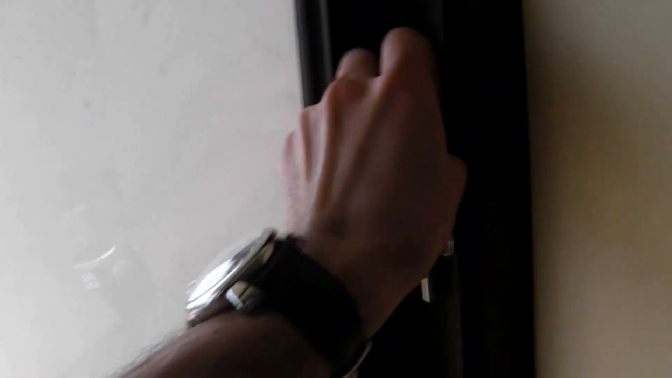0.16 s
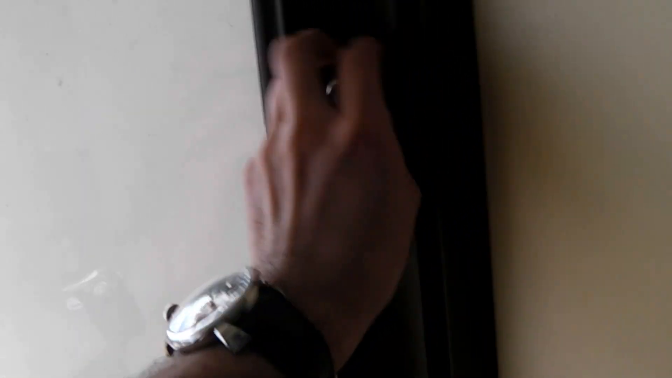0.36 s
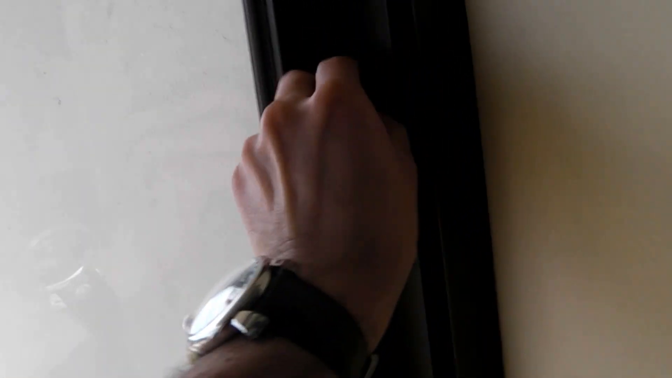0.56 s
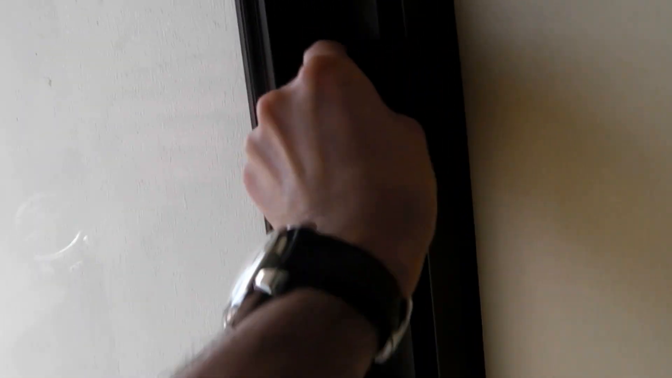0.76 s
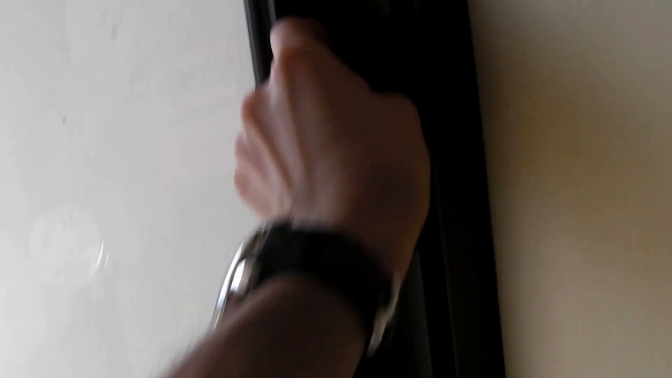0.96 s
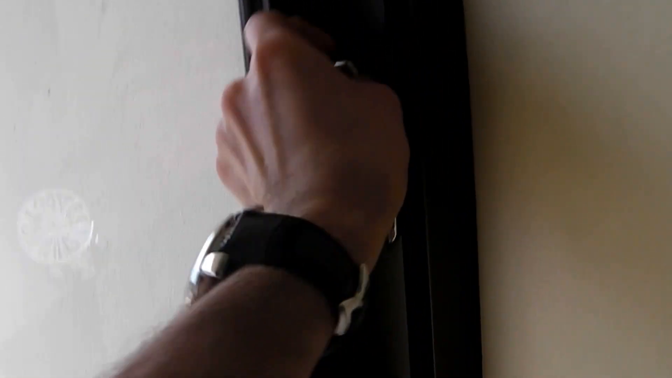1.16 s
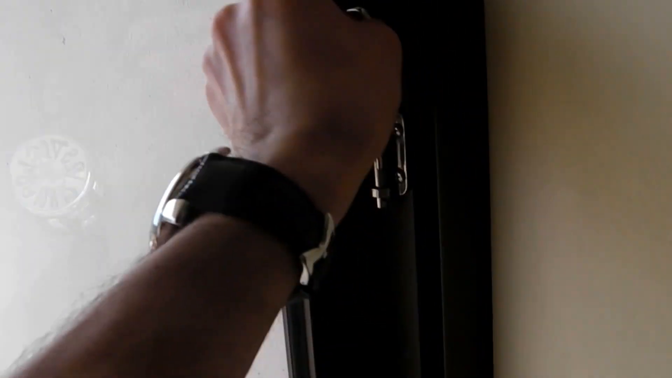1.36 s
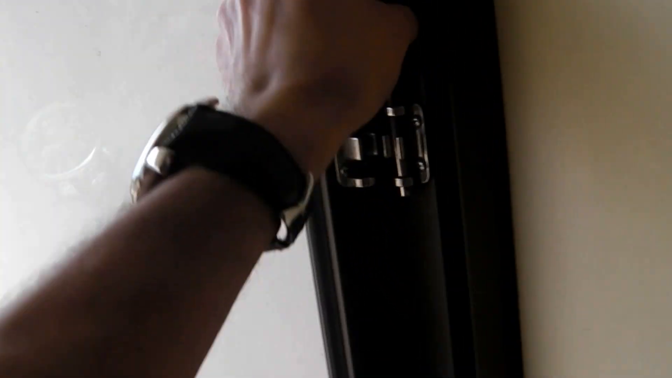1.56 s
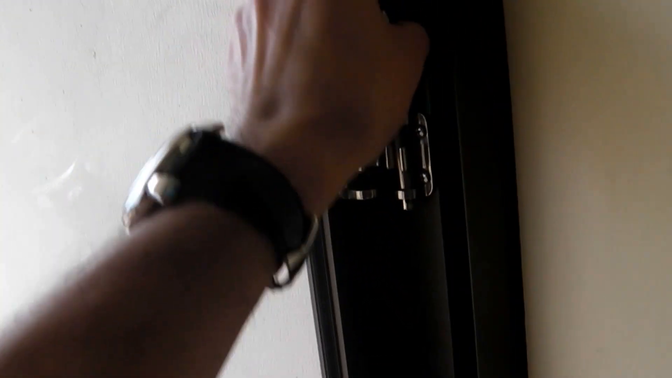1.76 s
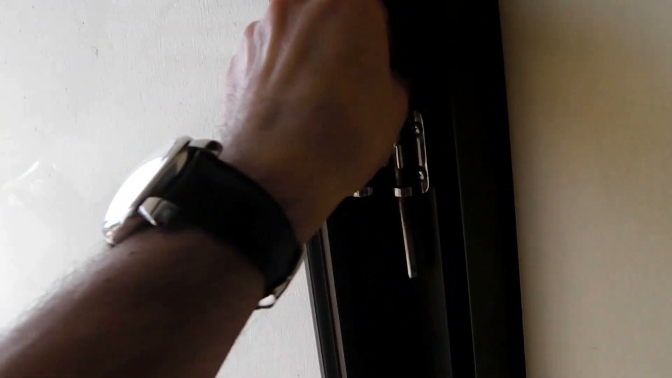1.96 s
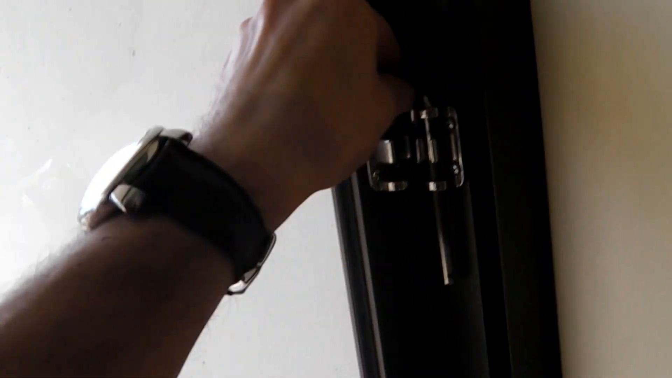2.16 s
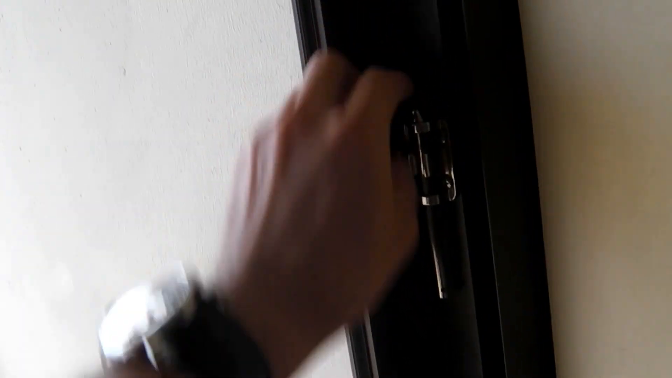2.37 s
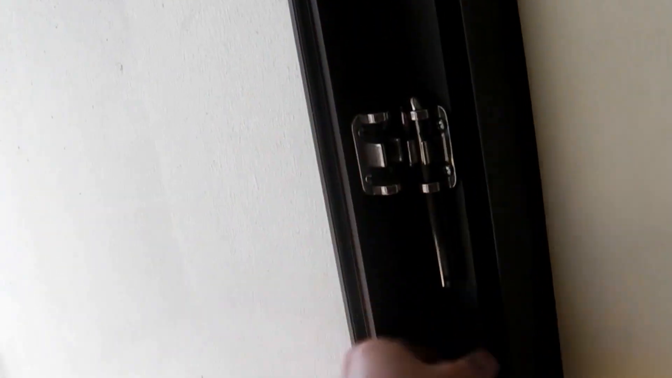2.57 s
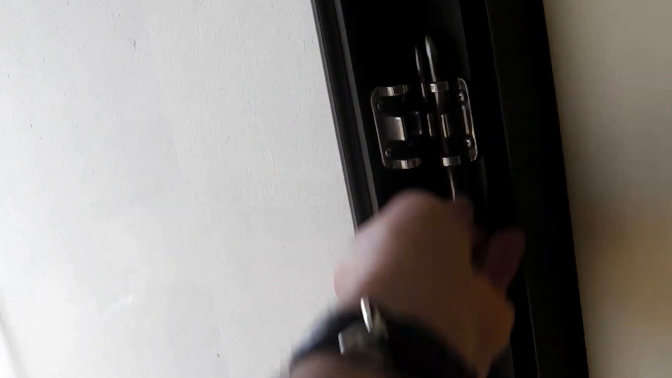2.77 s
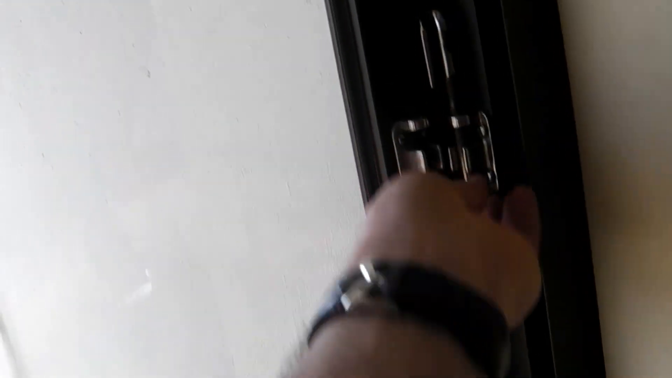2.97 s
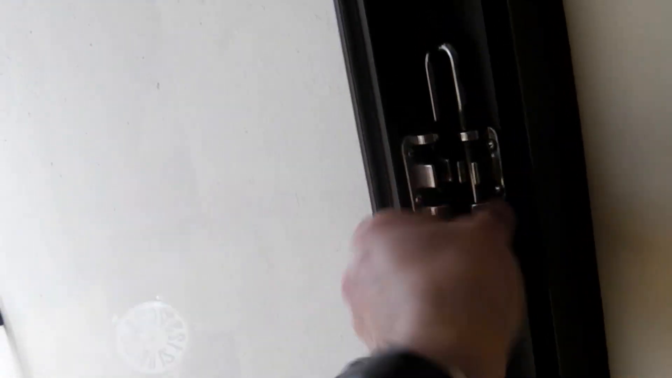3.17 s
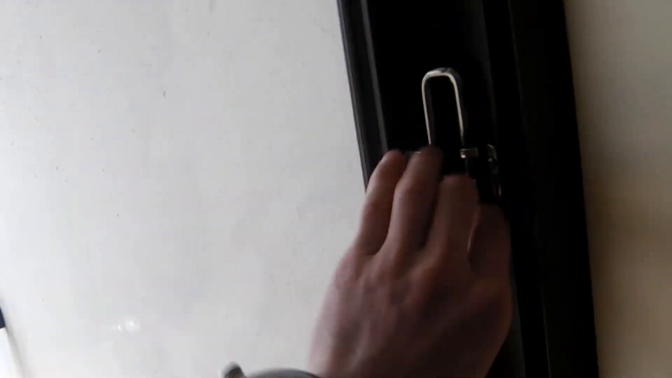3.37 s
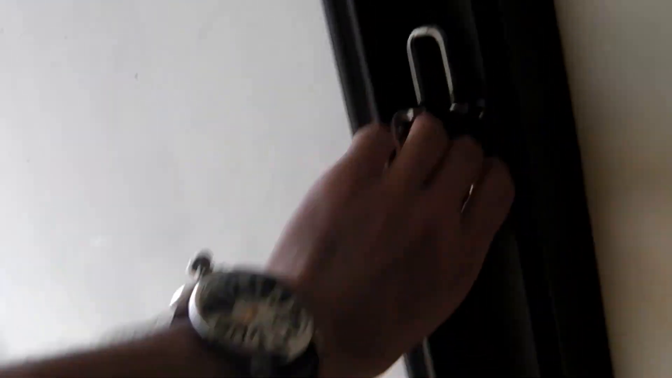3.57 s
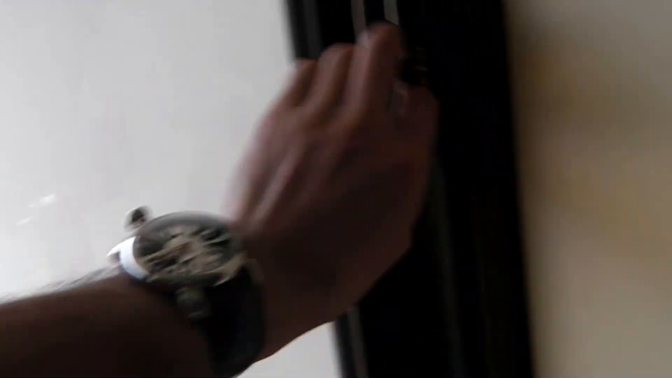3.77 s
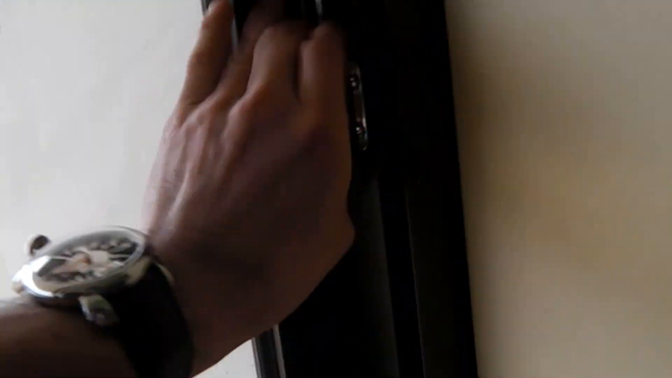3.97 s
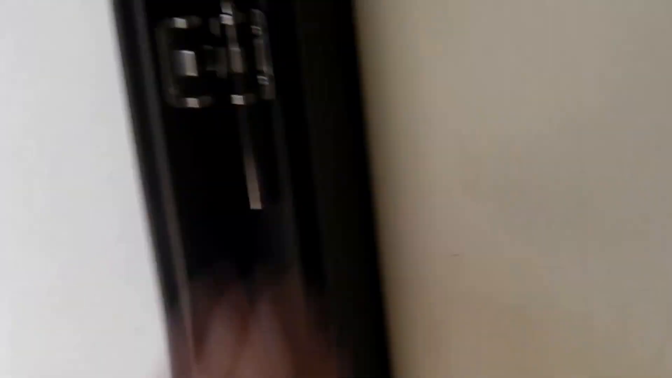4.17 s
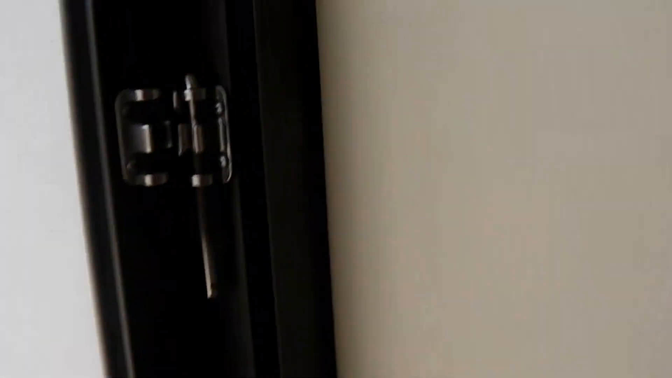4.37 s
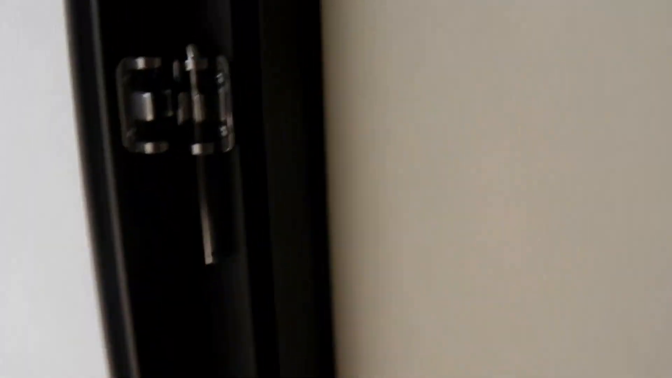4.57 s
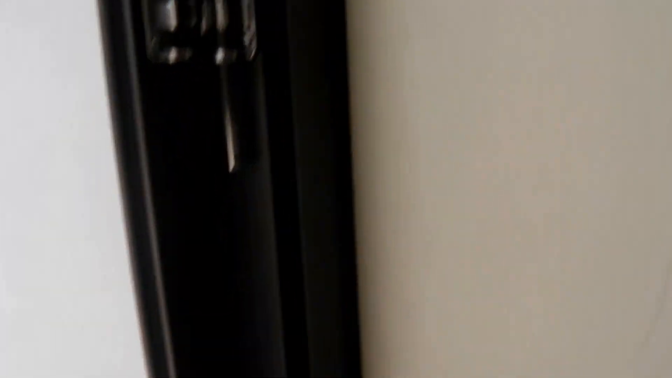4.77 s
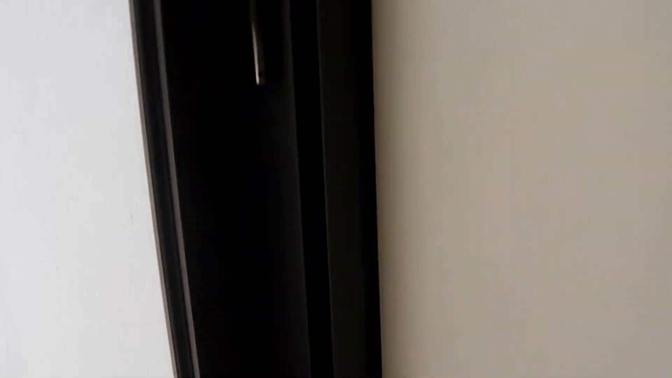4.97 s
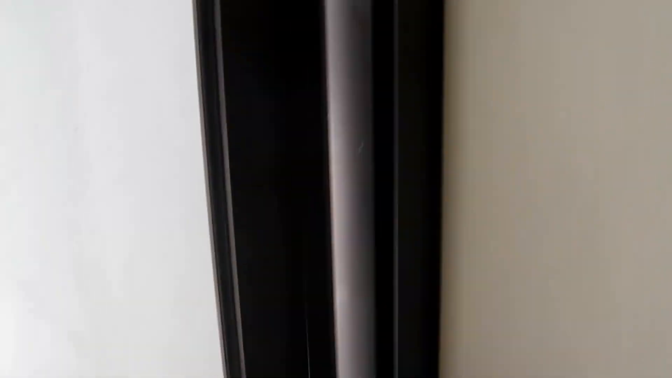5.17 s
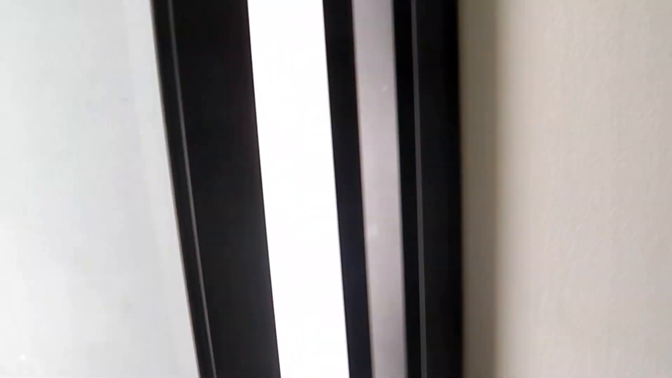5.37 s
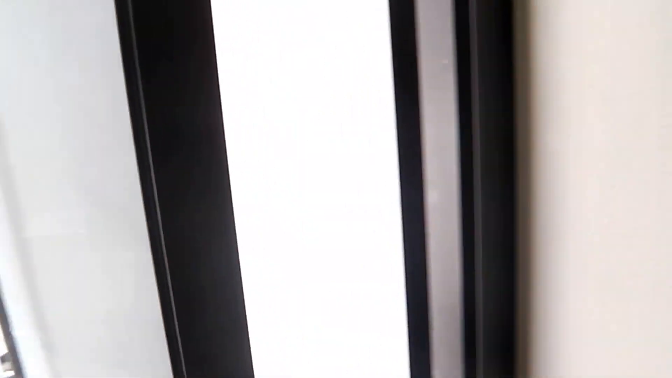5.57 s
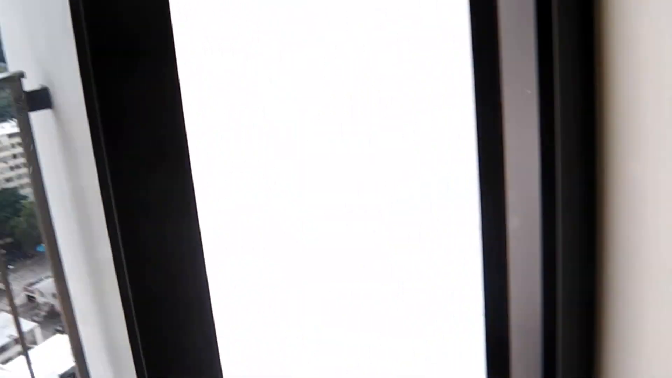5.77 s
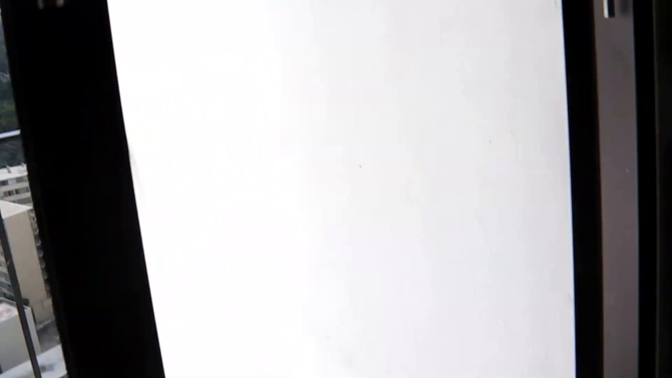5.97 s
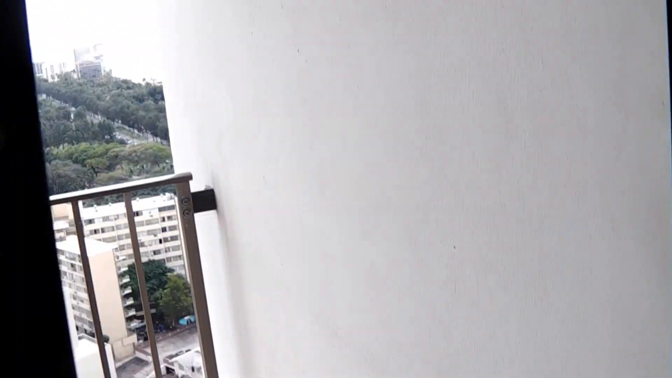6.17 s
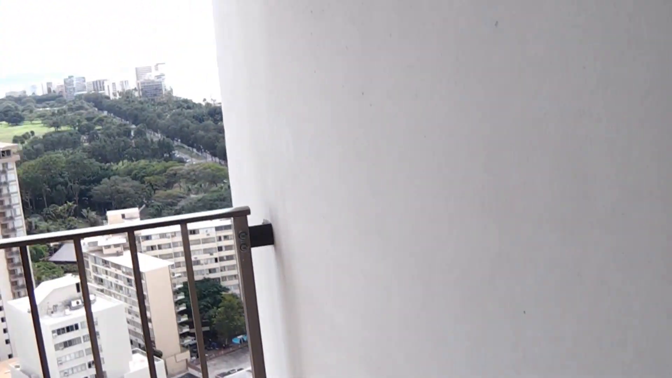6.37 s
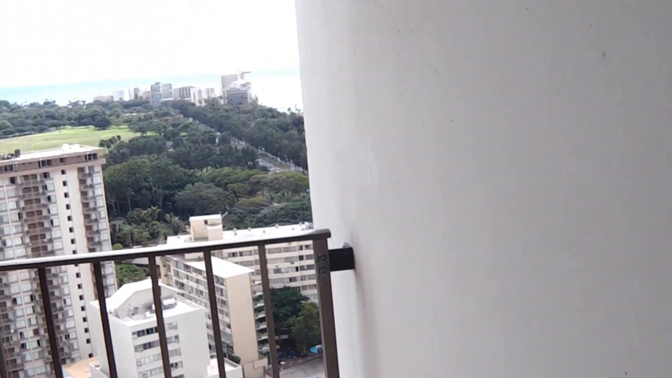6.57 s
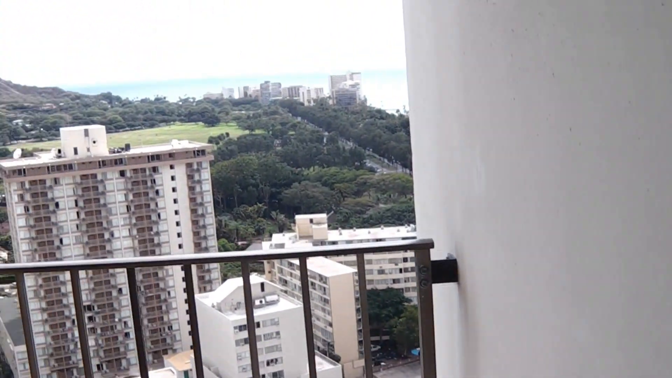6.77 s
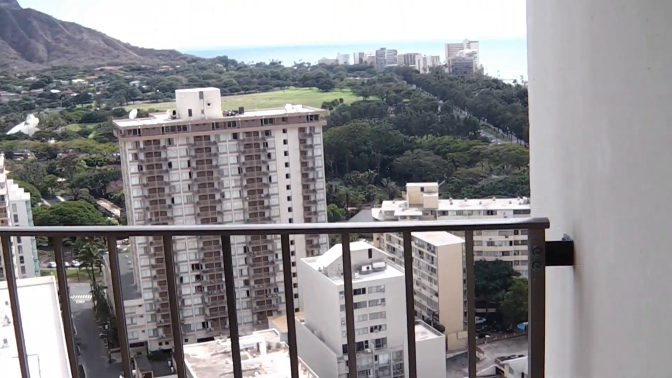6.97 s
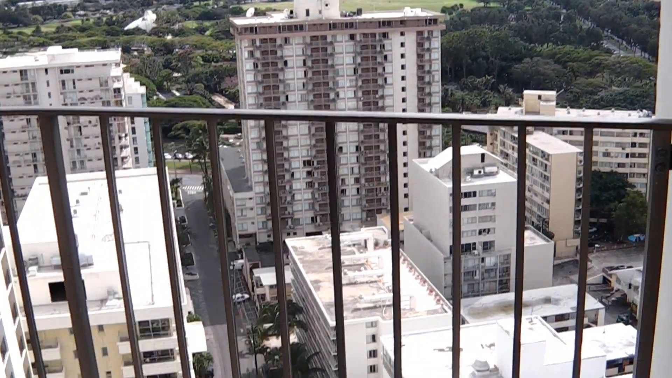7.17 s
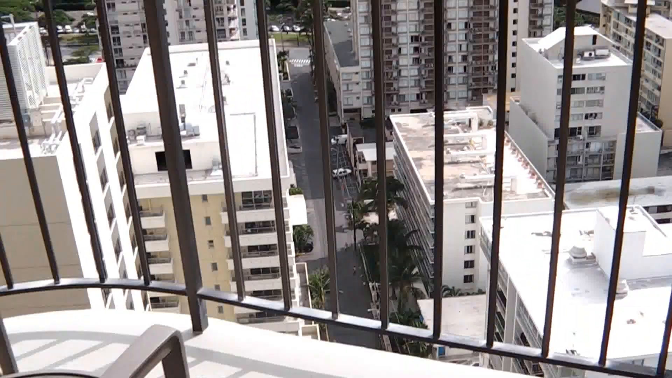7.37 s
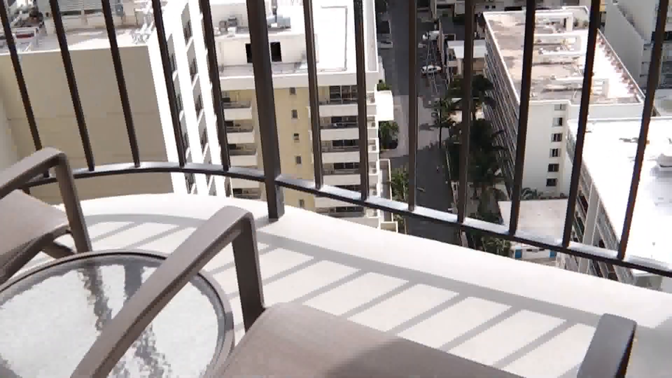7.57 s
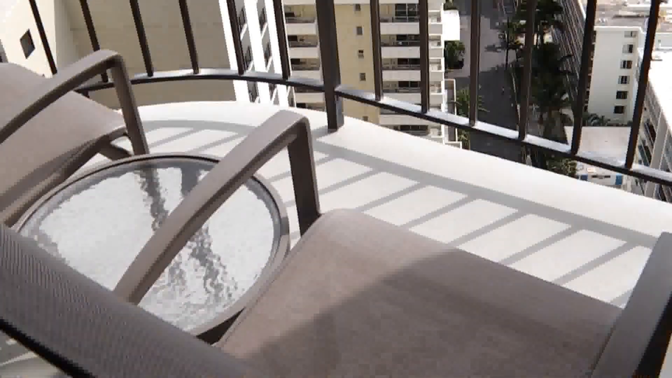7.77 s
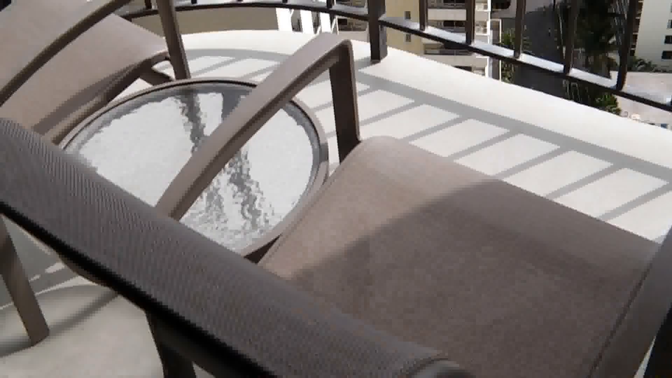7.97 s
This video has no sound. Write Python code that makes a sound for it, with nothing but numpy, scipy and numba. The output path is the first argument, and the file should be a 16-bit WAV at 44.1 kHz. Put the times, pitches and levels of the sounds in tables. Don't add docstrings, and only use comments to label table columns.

```python
import sys
import numpy as np
from scipy import signal
from scipy.fft import rfft, irfft
from scipy.io import wavfile
from scipy.ndimage import uniform_filter1d
from numba import njit

SR = 44100
rng = np.random.default_rng(int(sys.argv[2]) if len(sys.argv) > 2 else 0)


def voltage_ratio(decibels):
    exponent = np.asarray(decibels, float) / 20
    return 10 ** exponent


def to_wav(sig):
    pcm = np.clip(np.atleast_2d(sig), -1, 1) * 32767
    pcm = np.round(pcm).astype(np.int16)
    wavfile.write(sys.argv[1], SR, pcm.T)


N = 353682

# time in seconds, firing rate in Hz, level in dB.
ENGINE = [(0.0, 69.2, -45), (0.38, 73.7, -33), (0.57, 76, -46), (0.7, 77.4, -34.5), (0.92, 77.9, -33),
          (1.24, 74.5, -43.5), (1.6, 82.5, -34.5), (1.95, 86.2, -40), (2.31, 84.4, -26.5),
          (2.52, 80.6, -39), (2.8, 78.5, -28.5), (3.1, 73.9, -41), (3.55, 72.3, -40.5), (3.67, 71.1, -32),
          (4.09, 70.9, -40.5), (4.74, 74.9, -41), (4.9, 78, -46)]
# middle in seconds, half length in seconds, peak in dB.
SECOND_SWELLS = [(.15, 0.53, -52), (.52, 0.19, -40.5), (2.0, 0.087, -41), (2.78, 0.16, -46),
                 (3.2, 0.2, -42), (4.75, 0.46, -50.5)]
THIRD_SWELLS = [(.2, .35, -49.5), (1.3, .31, -49.5), (3.52, .6, -41), (4.7, .64, -51.5)]
SWELL_FALL_DB, SECOND_FLOOR_DB, THIRD_FLOOR_DB = 26, -52, -77

# frequency in Hz, density in dB per Hz.
RUMBLE = [(12, -31), (20, -21), (48, -3), (102, 1.5), (259, -14), (300, -22), (390, -7.5), (660, -120)]
ROAR = [(150, -73), (260, -44), (312, -14), (359, -1), (404, 1), (603, -9), (900, -25.5), (1170, -61)]
TYRES = [(530, -3.5), (900, 0.5), (1870, -8), (2500, -11.5), (6120, -20.5), (9000, -25), (11700, -33),
         (19800, -120)]
HISS = [(880, -46), (1500, -3), (3000, 4), (3310, -17), (3660, 0.5), (7540, 0.5), (12400, 0.5), (16000, -5)]
HISS_DB = -55.5
# time in seconds, opening from 0 (shut) to 1 (outside).
GAP = [(0, 0.41), (4.75, 0.41), (5.18, 0.64), (5.6, 0.79), (6.1, 0.82), (6.6, 0.88), (8.02, 1)]
# shut in dB, outside in dB, then (roar, tyres) murmur of the shaken door in dB.
RUMBLE_DB = (-46.5, -35.5)
ROAR_DB = (-60, -39, -25)
TYRES_DB = (-67.5, -38, -30)
MURMUR_T60_S = 0.85
# time in seconds, tyre gain in dB.
TRAFFIC = [(0, 0.8), (5.6, 1.2), (6.4, 1), (6.9, 1), (7.3, 1), (7.7, 0), (8.02, 0)]
# start in seconds, depth in dB.
DUCKS = [(0.98, 10), (1.77, 7), (2.04, 9), (2.46, 1.5), (2.98, 13), (4.12, 27), (4.29, 5)]
RECOVER_S = 0.19

# frequency in Hz, level in dB, decay t60 in seconds.
PANE = [(410.5, 14.5, 0.18), (449, 16.5, 0.092), (470, 1, 0.18), (672, -0.5, 0.037)]
FRAME = [(865, -7, 0.051), (1000, -0.5, 0.045), (1346, 7.5, 0.0053), (1730, 1.5, 0.015),
         (2046, 10.5, 0.021), (2290, 8.5, 0.02), (2610, 11, 0.0051), (3050, 7.5, 0.015), (3110, 2.5, 0.022)]
BRACKET = [(4330, -4, 0.0068), (5420, 3.5, 0.0045), (5690, 1.5, 0.03), (6230, 4, 0.018),
           (6930, -2.5, 0.033)]
PIN = [(8200, 16.2, 0.0011), (9400, 3.5, 0.004), (10790, 5, 0.012), (11240, 4.5, 0.024)]
DETUNE = .03

# peak in seconds, rise in seconds, fall in seconds, peak in dB, brightness in dB.
SCRAPES = [(0.088, 0.27, 0.045, -49, 4), (0.252, 0.1, 0.15, -43.5, 0), (0.422, 0.015, 0.0022, -40, -11),
           (0.941, 0.06, .003, -35, 1), (1.745, 0.039, .003, -38, 3), (2.0, 0.099, 0.043, -34.5, 0.5),
           (2.023, 0.016, 0.0037, -30.5, -11), (2.05, 0.0025, 0.029, -16, 2.5),
           (2.112, 0.044, 0.052, -33.5, -1), (2.756, 0.13, 0.15, -48.5, 12),
           (2.862, 0.0034, 0.071, -33.5, 1), (2.911, 0.0099, 0.0024, -26.5, -6),
           (2.95, 0.12, .003, -27, -2.5), (3.189, 0.11, 0.048, -43, -7), (3.334, 0.051, 0.0037, -46, -2),
           (3.477, 0.012, .003, -31, -4), (4.005, 0.03, 0.004, -35, -2), (4.095, 0.036, .003, -25.5, -5),
           (4.25, 0.1, 0.11, -33.5, 2), (4.28, 0.013, .003, -26, 2), (4.697, 0.0066, 0.21, -37, 1),
           (5.2, .012, 0.045, -29, -10.5), (5.213, 0.038, 0.0088, -35, -2)]
SCRAPE_FOOT_DB = 37.5
# time in seconds, force in dB.
BREAK = [(4.85, -59.5), (4.97, -39), (5.04, -28), (5.144, -25), (5.17, -25.5), (5.202, -24.5), (5.222, -33),
         (5.25, -44)]

# start in seconds, peak in dB, centre in Hz,
# width in Hz, decay t60 in seconds.
PINGS = [(.07, -40, 5630, 900, 0.21), (.075, -46, 7200, 300, 0.32), (.235, -44.5, 5550, 700, 0.41),
         (0.431, -37, 5400, 700, 0.31), (1.748, -24, 7100, 700, 0.14), (1.7486, -29, 7360, 12000, 0.041),
         (1.751, -37, 6140, 900, 0.45), (2.146, -26.5, 2105, 252, 0.081), (4.097, -12, 7300, 700, 0.061),
         (4.098, -14, 11300, 1200, 0.057), (4.285, -35, 5300, 604, 0.44), (4.737, -21, 7900, 12000, 0.042),
         (5.134, -11, 7000, 12000, 0.068), (5.212, -11, 11500, 6000, 0.015)]

# time in seconds, steel peak in dB,
# pane thud in dB, brightness in dB (+ pin top, - frame).
CRACKS = [(0.426, -2, -10, -6), (1.7487, -0.5, -15, 6), (2.195, 5, -11, 5.5), (4.0965, 3.5, -10.5, 6),
          (4.7372, -13, -51, 4), (5.1345, 3, -3.5, -2)]
SNAPS = [(0.611, -20, -7, -4.5), (0.9606, 6.5, -40, 1), (0.9892, -28, -10, 7), (1.0934, -8.5, -6.5, -2),
         (1.5722, -20.5, -9.5, -4), (2.0265, -0.5, -4.5, 3), (2.0866, -12, -18, -3),
         (2.107, -14, -13.5, -1), (2.146, -7.5, -19, -1), (2.2709, -7.5, -6.5, 2), (2.8485, -13, -15, -3.5),
         (2.9528, 8, -12, 0.5), (3.2056, -13, -19, -4), (3.276, -5, -10, -2.5), (3.3489, 3.5, -3, 2),
         (4.2093, -6.5, -49, 4), (4.6935, -25, -50, 4), (5.088, -22, -8, -9), (5.131, -5, -17, 7),
         (5.2126, -16, -38, -2)]
RATTLES = [(.4295, -12.5, -20, 6), (.434, -18.5, -23, -8), (0.9376, -8, -13, -2.5), (0.9462, 6, -11.5, 4),
           (1.1224, -22, -16.5, 1), (1.6298, -6.5, -14, 6.5), (1.719, -33, -34, 2), (2.038, 4, -7, 5),
           (2.2072, 0.5, -16, 4.5), (2.2805, -1.5, -9.5, -0.5), (2.6842, -18, -11, 4),
           (2.8045, -22.5, -29, 7), (2.9103, -8.5, -13.5, -8.5), (2.9152, -3, -11.5, 2.5),
           (2.958, -13, -5, -2), (2.9625, 1, -6, 2.5), (3.1794, -10.5, -13.5, -2), (3.3359, 5, -32, 2.5),
           (3.343, -6, -13, 1), (3.478, -9.5, -6.5, -6), (3.8879, -26, -14.5, -9), (4.0082, 3, -8, 0),
           (4.253, -7.5, -19.5, 4), (4.2817, 2.5, -17.5, 1.5), (4.2845, 0, -16, 2.5), (5.1965, -17, -29, 0)]
TOUCHES = [(0.164, -25.5, -28, -2.5), (0.304, -31, -15, 3), (0.3341, -33, -53, 8), (0.3474, -28, -26, -6.5),
           (.4195, -23, -18, -14), (0.5397, -30, -47, 7), (0.8303, -38, -23.5, 0), (0.8514, -36, -45, -11),
           (1.065, -29, -45, 4), (1.16, -34, -45, 4), (1.183, -30, -46, 1), (1.2469, -31, -22.5, 0),
           (1.987, -17.5, -18, -8), (1.999, -14, -12.5, -8), (2.834, -20, -17, -2), (3.163, -25, -23, -7),
           (3.298, -20, -18, -9), (3.321, -18, -32, 2), (3.6265, -29, -20.5, -10), (3.8573, -32, -34, 4),
           (4.684, -35, -49, -3), (4.8636, -25.5, -43, 2), (4.9117, -32, -22, -12.5),
           (4.9332, -22.5, -35, 8)]
CRACK_MS, SNAP_MS, RATTLE_MS, TOUCH_MS = 2.2, 7.8, 9.7, 8.1
LEAD_S = .006

# start in seconds, peak in
# dB, frequency in Hz, decay t60 in seconds.
CHIMES = [(.426, -14, 3280, 0.031), (.426, -10, 5670, 0.037), (0.427, -19, 797, 0.034),
          (.4265, -12, 2500, .015), (.427, -20, 13000, .02), (.946, -5.5, 2150, 0.043),
          (.96, -10, 1710, 0.031), (.961, -17, 2030, 0.04), (1.631, -24, 1690, .044),
          (1.631, -23.5, 2935, 0.059), (1.635, -17, 6150, .025), (1.719, -31, 5360, .03),
          (1.748, -11, 5500, .031), (1.7475, -4.5, 7160, 0.031), (2.2, -31, 1700, 0.035),
          (1.7488, -27, 667, 0.048), (2.026, -24, 1600, 0.025), (2.037, -17.5, 790, .04),
          (2.038, -9, 6590, .04), (2.147, -23, 2083, .06), (2.194, -17, 760, 0.025),
          (2.196, -9.5, 6520, .03), (2.206, -20, 1986, .039), (2.206, -14, 5820, .069),
          (2.271, -12.5, 2200, 0.026), (2.282, -21, 1800, 0.058), (2.849, -25, 5600, .03),
          (2.911, -21, 3240, .033), (2.954, -13, 1920, .07), (2.958, -14, 7060, .05),
          (2.959, -10, 5600, .04), (2.9, -18, 3970, .019), (3.275, -14.5, 3966, .022),
          (3.276, -25, 1990, 0.063), (3.335, -18, 5730, .049), (3.347, -16, 1960, .033),
          (3.478, -19, 2110, 0.041), (3.479, -19, 760, 0.056), (4.008, -14.5, 820, 0.038),
          (4.008, -14, 7300, .03), (4.097, -15, 1410, .023), (4.097, -6, 7250, .03),
          (4.253, -16, 11500, .02), (4.282, -10, 2290, .025), (4.282, -9, 11400, 0.027),
          (4.282, -21.5, 541.7, 0.063), (4.283, -13, 6250, 0.049),
          (4.737, -19, 3300, 0.018), (4.7372, -14.5, 11400, 0.019), (5.05, -26, 2310, 0.055),
          (5.0801, -9.5, 460, 0.028), (5.133, -6, 550, 0.012), (5.137, -16, 1000, 0.042),
          (5.142, -19, 1500, 0.064), (5.199, -24, 1700, .04), (5.201, -24, 2900, 0.045)]
# start in seconds, peak in dB, stop in seconds.
SINGS = [(2.06, -33, 2.146), (2.147, -30, 2.195), (2.207, -18, 2.4), (2.8495, -25, 2.912),
         (2.914, -19, 2.953), (3.337, -18, 3.47), (4.254, -21, 4.282)]
PIN_HZ, SING_T60_S, SING_BEAT_HZ, SING_BEAT_DB = 9207, 0.15, 45, -13

# time in seconds, pitch in Hz, level in dB.
SQUEAKS = [
    [(.645, 11000, -72), (.66, 11200, -60), (.685, 11700, -61), (.71, 11700, -72)],
    [(.695, 5900, -72), (.715, 6300, -61), (.74, 7300, -63), (.8, 7600, -63), (.86, 7400, -61),
     (.9, 7000, -72)],
]
# centre in Hz, width in Hz.
BRISTLES = [(7000, 1100), (9500, 1100), (11400, 1200), (12600, 1000)]
# time in seconds, then the level of each band in dB.
WHISTLE = [(5.22, -60, -60, -60, -60), (5.35, -50, -54, -47, -54), (5.55, -38.5, -48, -48, -56),
           (5.9, -43, -48, -53, -52), (6.0, -40, -38, -46, -39), (6.24, -48, -34.5, -47, -44),
           (6.3, -55, -40, -52, -50), (6.455, -56, -35, -45, -50), (6.47, -57, -52, -49, -56),
           (6.62, -62, -57, -49, -56), (6.9, -60, -64, -56, -62)]

# start in seconds, peak in dB, frequency in Hz, decay t60 in seconds.
BUMPS = [(2.135, -26, 120.4, 0.34), (2.141, -30, 217, 0.2), (5.084, -18, 115.6, 0.19),
         (5.133, -2.5, 150, 0.0095), (7.694, -15.5, 91, 0.14)]

# time in seconds, force in dB.
SQUEAL = [(4.684, -40), (4.694, -35), (4.7, -28), (4.706, -20.5), (4.713, -32), (4.723, -23.5),
          (4.735, -22), (4.75, -31), (4.77, -60)]
# centre in Hz, width in Hz, level in dB.
GUIDE = [(1500, 660, -6.5), (2500, 420, 1.5), (3300, 640, 1), (4630, 830, -5), (5840, 560, -7),
         (7300, 1400, -3.5), (9700, 1100, -6.5), (11400, 1500, -12)]

# time in seconds, speed in dB.
SLIDE = [(5.24, -38.5), (5.4, -35.5), (5.53, -32.5), (5.75, -30.5), (5.95, -30.5), (6.21, -32),
         (6.3, -32.5), (6.455, -33), (6.49, -37), (6.6, -40), (6.75, -44), (7.2, -47.5), (8.02, -53)]
# time in seconds, depth in dB.
CATCHES = [(5.71, 6.4), (5.785, 2), (5.86, 3.7), (5.92, 6.3), (6.255, 2), (6.39, 4.2), (6.56, 3.1)]
CATCH_S = 0.011
# time in seconds, gain in dB.
PRESS = [(4.8, -7), (5.6, -3), (5.9, -5), (6.0, -4), (6.24, 2), (6.3, -3), (6.455, -3), (6.475, -0.5),
         (8.02, 1)]
# frequency in Hz, density in dB per Hz.
TRACK = [(600, -2), (1800, 2), (5600, 1), (6900, 3), (7600, 3.5), (8500, 2), (11000, -1.5), (14000, -16)]
SEAL = [(7000, -26), (8700, 0.5), (9450, 0), (10200, -4.5), (11300, 3), (12600, -6), (13600, -12),
        (15900, -12)]
SEAL_SLOPE, PIVOT_DB = 1.73, -30

ROOM_T60_S, ROOM_DAMP, ROOM_DB, CHIME_ROOM_DB = 0.39, 0.6, -17, -4.5
NOTCH_HZ, LEFT_DB = 7900, -2.5


def level(x, db):
    return x * voltage_ratio(db) / np.sqrt(np.mean(x ** 2))


def stereo(mid, side, left, right):
    return np.array([mid + left * side, mid - right * side])


def curve(table, off_db=-90):
    s, *columns = np.transpose(table)
    return [np.interp(np.arange(N) / SR, s, c, off_db, off_db) for c in columns]


def walk(rate_hz):
    k = int(SR / rate_hz)
    held = np.repeat(rng.standard_normal(N // k + 1), k)
    return 1.91 * uniform_filter1d(uniform_filter1d(held, k), k)[:N]


def band(x, lo_hz, hi_hz):
    return signal.sosfilt(signal.butter(3, (lo_hz, hi_hz), "bandpass", fs=SR, output="sos"), x)


def ring(modes, scatter_db, spread, size=2048, longest_s=.02, detune=.02):
    hz, db, t60_s = np.transpose(modes)[:, :, None]
    chance = rng.standard_normal((3, len(modes), 1))
    t = np.arange(size) / SR
    fade = voltage_ratio(db + scatter_db * chance[0] - 60 * t / np.minimum(t60_s, longest_s))
    turn = 2 * np.pi * hz * (1 + detune * chance[1]) * t
    return np.array([np.sum(fade * np.sin(turn + side * spread * chance[2]), 0) for side in (1, -1)])


def add(out, sound, s):
    i = int(s * SR)
    out[:, i:i + sound.shape[1]] += sound[:, :N - i]


def coloured(spectrum, side_hz, flicker_db):
    hz, db = np.transpose(spectrum)
    f = np.arange(N // 2 + 1) * SR / N + 1e-9
    noise = rfft(rng.standard_normal((2, N))) * voltage_ratio(np.interp(np.log(f), np.log(hz), db, -99, -99))
    noise[1] *= np.clip(f / side_hz, .12, 1.2)
    out = 0
    for centre in np.arange(np.log2(hz[0]), np.log2(hz[-1]) + 1):
        octave = irfft(noise * np.clip(1 - abs(np.log2(f) - centre), 0, 1), N)
        out = out + octave * voltage_ratio(np.clip(flicker_db, -.3, 1.) * walk(11))
    mid, side = level(out, 0)
    return stereo(mid, side, 1, 1)


@njit
def walls(x, lags, gain, damp):
    line, soft, out = np.zeros((8, 4096)), np.zeros(8), np.zeros((2, len(x)))
    for i in range(len(x)):
        total = 0.
        for k in range(8):
            soft[k] += (1 - damp) * (gain[k] * line[k, (i - lags[k]) & 4095] - soft[k])
            total += soft[k]
            out[k % 2, i] += soft[k]
            out[1 - k % 2, i] += .7 * soft[k]
        for k in range(8):
            line[k, i & 4095] = x[i] + soft[k] - total / 4
    return out


def ducking():
    t = np.arange(N) / SR
    db = sum(depth * np.exp(-(np.maximum(t - s, 0) / RECOVER_S) ** 0.94) * (t > s) for s, depth in DUCKS)
    return voltage_ratio(-uniform_filter1d(db, size=400))


def swells(rows, floor_db):
    t = np.arange(N) / SR
    return voltage_ratio(floor_db) + sum(voltage_ratio(peak - SWELL_FALL_DB * ((t - s) / half_s) ** 2) for s, half_s, peak in rows)


def engine():
    hz, db = curve(ENGINE)
    running = hz > 0
    second = running * swells(SECOND_SWELLS, SECOND_FLOOR_DB)
    third = running * swells(THIRD_SWELLS, THIRD_FLOOR_DB)
    turn = 2 * np.pi * np.cumsum(hz * (1 + .005 * walk(14))) / SR
    out = 0
    for multiple, gain in enumerate((voltage_ratio(db), second, third), 1):
        out = out + np.sqrt(2) * gain * voltage_ratio(1.3 * walk(14)) * np.sin(multiple * turn)
    return out


def town(door):
    gap, duck = curve(GAP, off_db=1)[0], ducking()
    keep = voltage_ratio(-2 * 60 / MURMUR_T60_S / SR)
    murmur = np.sqrt(signal.lfilter([1 - keep], [1, -keep], door.mean(0) ** 2) + 1e-18)

    def far(dbs):
        return duck * voltage_ratio(dbs[0] + gap * (dbs[1] - dbs[0]))

    rumble_gain = far(RUMBLE_DB)
    roar_gain = np.hypot(far(ROAR_DB), voltage_ratio(ROAR_DB[2]) * murmur)
    traffic = voltage_ratio(curve(TRAFFIC, off_db=0)[0])
    tyres_gain = np.hypot(far(TYRES_DB) * traffic, voltage_ratio(TYRES_DB[2]) * murmur)
    rumble = rumble_gain * coloured(RUMBLE, side_hz=900, flicker_db=0.0)
    roar = roar_gain * coloured(ROAR, side_hz=4400, flicker_db=5.0)
    tyres = tyres_gain * coloured(TYRES, side_hz=3700, flicker_db=4.0)
    hiss = voltage_ratio(HISS_DB) * coloured(HISS, side_hz=7000, flicker_db=3.8)
    return rumble + roar + tyres + duck * engine() + hiss


def pressure(lean):
    t, gain = np.arange(N) / SR, voltage_ratio(curve(BREAK)[0] - 8.0)
    for s, rise_s, fall_s, db, bright_db in SCRAPES:
        away = np.where(t < s, (s - t) / max(rise_s, .001), (t - s) / max(fall_s, .001))
        gain = gain + voltage_ratio(db + lean * bright_db - SCRAPE_FOOT_DB * away) * (away < 1.5)
    return gain


def rubbing():
    grains = rng.standard_normal((2, N)) * voltage_ratio(2.2 * rng.exponential(size=N) + 1.2 * walk(150))
    # lean, modes, level dB, stereo width, band Hz
    bodies = ((0, BRACKET, -1.5, .5, 3600, 8200),
              (-1, FRAME, -2.5, .2, 1500, 3900),
              (1, PIN, -1.5, .7, 7800, 14000))
    out = 0
    for lean, modes, db, width, lo_hz, hi_hz in bodies:
        damped = band(ring(modes, 0, 0, longest_s=.006)[:1], lo_hz, hi_hz)
        mid, side = level(signal.oaconvolve(grains, damped)[:, :N], db)
        out = out + pressure(lean) * stereo(mid, side, width, width)
    return out


def pings():
    out, t = np.zeros((2, N)), np.arange(SR // 4) / SR
    for s, db, hz, width_hz, t60_s in PINGS:
        noise = rng.standard_normal((2, 2 * len(t)))
        buzz = band(noise, hz - width_hz / 2, hz + width_hz / 2)[:, len(t):]
        mid, side = level(buzz, db)
        fade = voltage_ratio(-60 * t / t60_s) * (1 - np.exp(-t / 0.00056))
        add(out, fade * stereo(mid, side, 1.0, 0.32), s)
    return out


def contacts():
    kinds = (CRACKS, CRACK_MS), (SNAPS, SNAP_MS), (RATTLES, RATTLE_MS), (TOUCHES, TOUCH_MS)
    return sorted((s, db, pane_db, db - 7.0 - bright_db, db - 5.5 + bright_db, ms)
                  for table, ms in kinds for s, db, pane_db, bright_db in table)


def latch():
    out, t = np.zeros((2, N)), np.arange(SR // 6) / SR - LEAD_S
    late_s = np.maximum(t, 0)
    lead_in = .35 * np.exp(np.minimum(t, 0) / .0016)
    # modes, port spread, longest t60 s, band Hz, trim dB
    bodies = ((PANE, .1, .055, 330, 900, -8.0),
              (FRAME, .2, .008, 650, 3800, -3.0),
              (BRACKET, .35, .007, 3600, 8200, -9.5),
              (PIN, .4, .006, 7800, 15500, -4.0))
    for s, bracket_db, pane_db, frame_db, pin_db, rattle_ms in contacts():
        mid, side = rng.standard_normal((2, len(t))) * voltage_ratio(2.2 * rng.exponential(size=len(t)))
        after = np.exp(-t / (max(rattle_ms, .3) / 1000)) + 0.051 * np.exp(-t / 0.077)
        shake = .25 * np.where(t < 0, lead_in, after)
        for body, db in zip(bodies, (pane_db, frame_db, bracket_db, pin_db)):
            modes, spread, longest_s, lo_hz, hi_hz, trim_db = body
            sluggish = np.exp(-late_s / 0.025 * (modes is PANE))
            force = shake * sluggish * stereo(mid, side, spread, spread)
            force[:, int(LEAD_S * SR)] += 2.2
            response = ring(modes, scatter_db=-1.5, spread=spread, longest_s=longest_s, detune=DETUNE)
            sound = signal.fftconvolve(band(response, lo_hz, hi_hz), force, axes=1)
            add(out, sound * voltage_ratio(db + trim_db) / abs(sound.mean(0)).max(), s - LEAD_S)
    return out


def chimes():
    out = np.zeros((2, N))
    for s, db, hz, t60_s in CHIMES:
        cluster = [(hz, db, t60_s), (hz * 1.06, db - 13.5, t60_s), (hz * .93, db - 20.5, t60_s)]
        add(out, ring(cluster, 0, hz / 9000, longest_s=1, detune=0), s)
    for s, db, stop_s in SINGS:
        pair = [(PIN_HZ, db, SING_T60_S), (PIN_HZ + SING_BEAT_HZ, db + SING_BEAT_DB, SING_T60_S)]
        song = ring(pair, 0, 0.34, size=8192, longest_s=1, detune=0)
        add(out, song * np.clip((stop_s - s - np.arange(8192) / SR) / .002, 0, 1), s)
    return out


def whistles():
    out = 0
    for (hz, width_hz), db in zip(BRISTLES, curve(WHISTLE)):
        mid, side = level(band(rng.standard_normal((2, N)), hz - width_hz / 2, hz + width_hz / 2), 0)
        out = out + voltage_ratio(db + 1.1 * walk(18)) * stereo(mid, side, 1.1, 0.8)
    for squeak in SQUEAKS:
        hz, db = curve(squeak)
        turn = 2 * np.pi * np.cumsum(hz * (1 + .006 * walk(300))) / SR
        out = out + voltage_ratio(db + 3 * walk(120)) * np.sin(turn)
    return out


def bumps():
    out = np.zeros((2, N))
    for s, db, hz, t60_s in BUMPS:
        add(out, ring([(hz, db, t60_s)], 0, 0, size=8192, longest_s=1, detune=0), s)
    return out


def squeal():
    grains = rng.standard_normal((2, N)) * voltage_ratio(1.5 * rng.exponential(size=N))
    rung = sum(level(band(grains, hz - width_hz / 2, hz + width_hz / 2), db) for hz, width_hz, db in GUIDE)
    mid, side = level(rung, 0)
    return voltage_ratio(curve(SQUEAL)[0]) * stereo(mid, side, .35, 0.25)


def slide():
    t = np.arange(N) / SR
    stall_db = sum(db * np.exp(-((t - s) / CATCH_S) ** 2) for s, db in CATCHES)
    speed_db = curve(SLIDE)[0] - stall_db
    tear = voltage_ratio(curve(BREAK)[0])
    seal_db = PIVOT_DB + SEAL_SLOPE * (speed_db - PIVOT_DB) + curve(PRESS)[0]
    track = (voltage_ratio(speed_db - 1.0) + tear) * coloured(TRACK, side_hz=8540, flicker_db=-2.5)
    seal = (voltage_ratio(seal_db) + voltage_ratio(-7.5) * tear) * coloured(SEAL, side_hz=12000, flicker_db=-2.5)
    judder = voltage_ratio(.8 * walk(40) + .3 * walk(14))
    return judder * (track + seal)


def scene():
    rough = latch() + pings() + rubbing() + squeal()
    clean = chimes()
    door = rough + clean
    lags = rng.integers(400, 2200, 8)
    into_room = (rough + voltage_ratio(CHIME_ROOM_DB) * clean).mean(0) + 1e-18
    room = walls(into_room, lags, voltage_ratio(-60 * lags / SR / ROOM_T60_S), ROOM_DAMP)
    return door + voltage_ratio(ROOM_DB) * room + slide() + town(door) + bumps() + whistles()


def roll_off(x):
    return signal.sosfilt(signal.butter(12, 16280, fs=SR, output="sos"), x)


def record(dry):
    ports = dry * voltage_ratio(np.array([[LEFT_DB], [-LEFT_DB]]) / 2)
    ports = signal.filtfilt(*signal.iirnotch(NOTCH_HZ, 45., SR), ports)
    return roll_off(np.clip(ports, -1, 1))


dry = scene()
out = record(dry)
to_wav(out)
```